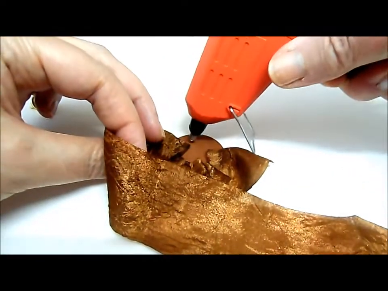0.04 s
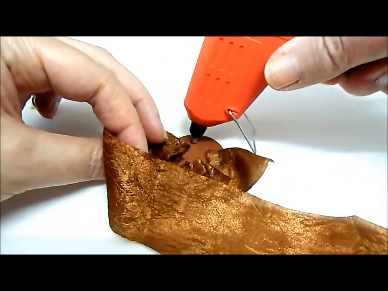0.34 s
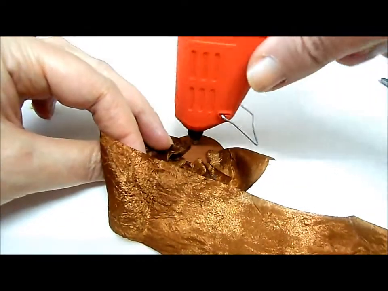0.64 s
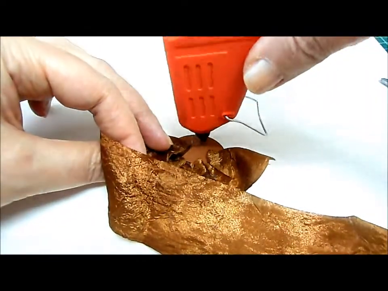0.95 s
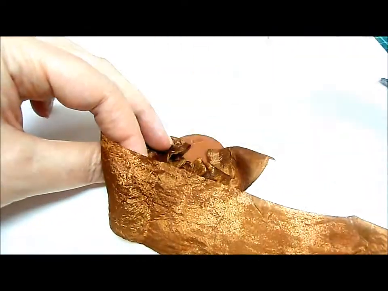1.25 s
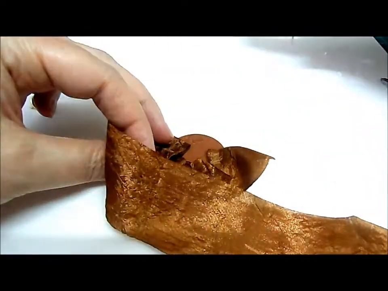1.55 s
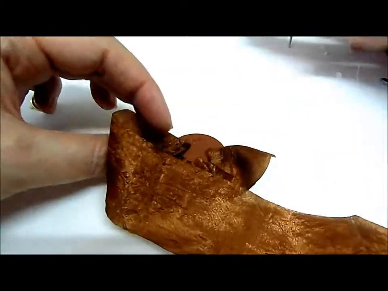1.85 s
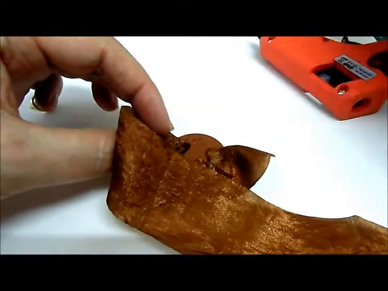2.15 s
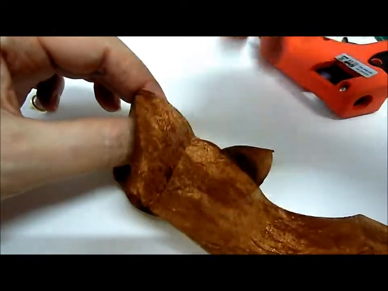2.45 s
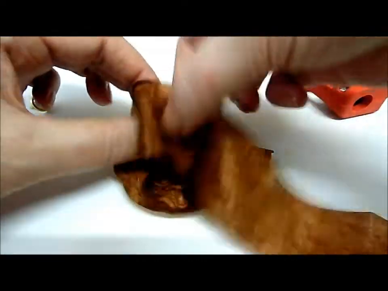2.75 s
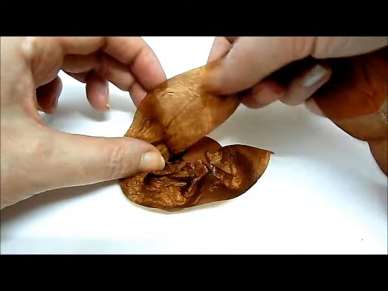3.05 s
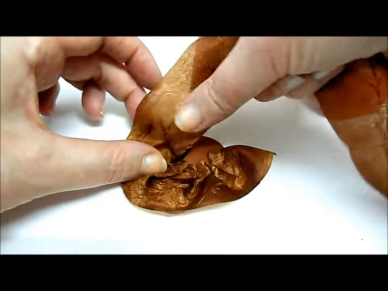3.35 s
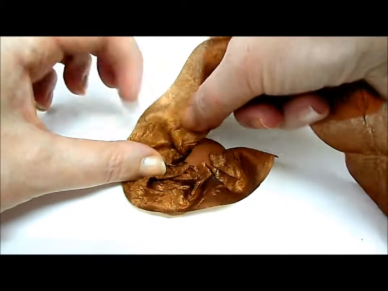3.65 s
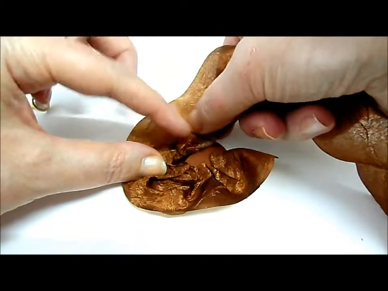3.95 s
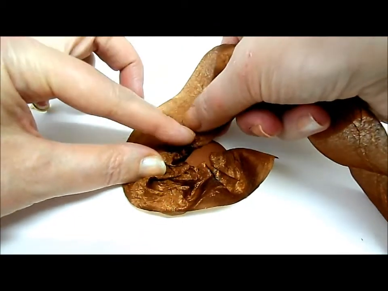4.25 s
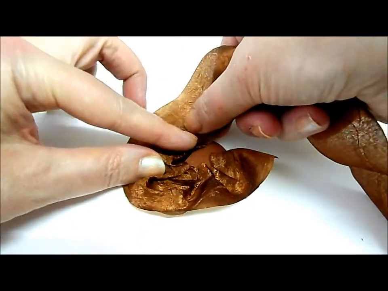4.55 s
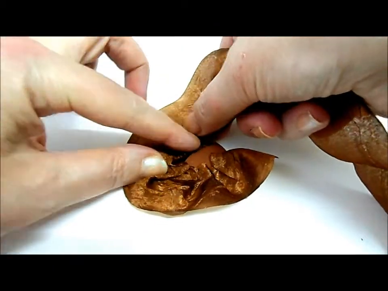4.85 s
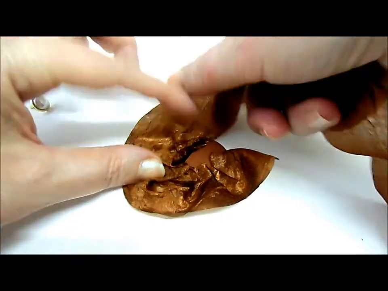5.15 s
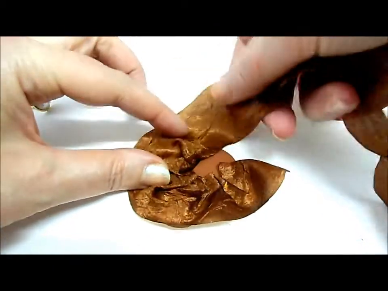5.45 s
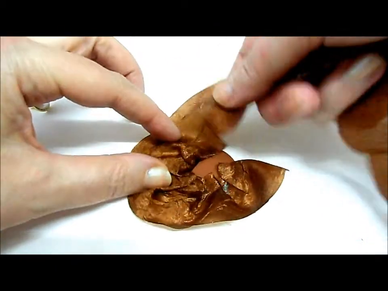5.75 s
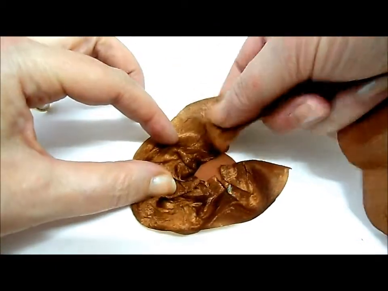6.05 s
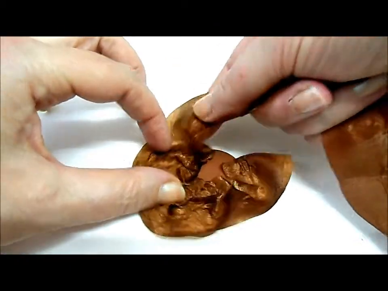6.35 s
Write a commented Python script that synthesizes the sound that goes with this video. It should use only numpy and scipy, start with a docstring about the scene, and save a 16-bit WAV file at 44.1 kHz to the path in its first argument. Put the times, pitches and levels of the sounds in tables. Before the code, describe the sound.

A glue gun knocks and clatters onto a tabletop, followed by quiet ribbon rustling and light clicks over a low rumble.

```python
"""Faint, even ticking comes first, close to the microphone in a small room; then ribbon rustles.
A hot glue gun scrapes the ribbon flower, bumps the worktable and is dropped, rocking to rest: its hollow
shell rings, the tabletop booms and the hardest knock overloads the microphone. Fingers fold and pinch
the stiff ribbon, stroke by stroke, with light clicks and more ticking over a low rumble and hiss."""
import sys
import numpy as np
from scipy import signal
from scipy.fft import rfft, irfft
from scipy.io import wavfile

SR = 44100
rng = np.random.default_rng(int(sys.argv[2]) if len(sys.argv) > 2 else 0)


def materialize(psi):
    """Save the field psi as 16-bit PCM at rate SR to the path in sys.argv[1].

    A 1-D psi becomes a single channel; in a 2-D psi each row is a channel.
    """
    bounded = np.clip(np.atleast_2d(psi).T, -1, 1)
    quanta = np.round(bounded * 32767).astype(np.int16)
    wavfile.write(sys.argv[1], SR, quanta)


N = 290619
RING = np.arange(SR // 2) / SR  # time axis of one short sound [s]


# the gun landing, close up: (time [s], tabletop [dB], shell [dB], crack [dB], tabletop cutoff [Hz])
GUN_KNOCKS = [(1.593, -6, -39, -24.5, 383), (1.629, -20.5, -29.5, -27.5, 1400),
              (2.0147, -29.5, -53, -41, 1340), (2.0611, -20, -18, -17, 702),
              (2.0650, -14.5, -32, -25.5, 397), (2.0720, 2.5, 2.5, -4, 3550),
              (2.1365, -14.5, -44, -22.5, 420), (2.1393, -21.5, -41, -17.5, 2010),
              (2.1683, -25, -27, -30, 596), (2.1728, -25, -31, -30, 1160)]
def glue_gun():
    """Each blow cracks at the contact, rings the hollow shell and booms the tabletop."""
    out = np.zeros(N)
    for s, table_db, shell_db, crack_db, cutoff_hz in GUN_KNOCKS:
        add(out, s, undb(shell_db) * shell() + undb(crack_db) * crack())
        add(out, s + .0007, undb(table_db) * tabletop(cutoff_hz))  # the heavy top answers a moment later
    return out


# modes of the worktable: (frequency [Hz], level [dB], t60 [s])
TABLETOP_MODES = [(43.2, -24.5, 0.18), (101, -15.5, 0.23), (115.1, -20, 0.196), (196.5, -21, 0.13),
                  (243, -20, 0.13), (296, -17.5, 0.084), (339, -19, .1), (433.3, -28.5, .08),
                  (595, -20.5, 0.044), (629, -9.5, 0.04), (783, -17.5, 0.042), (844, -17.5, 0.049),
                  (997, -13, 0.032), (1090, -20.5, 0.077), (1238, -13.5, 0.034), (1441, -23, 0.042),
                  (1540, -28, 0.0304)]
def tabletop(cutoff_hz):
    """The struck tabletop booms; a soft contact reaches only its low modes."""
    return soften(ring(TABLETOP_MODES), cutoff_hz)


# modes of the gun's plastic shell: (frequency [Hz], level [dB], t60 [s])
SHELL_MODES = [(1950, -28, 0.027), (2254, -12, 0.018), (2396, -23.5, 0.016), (2606, -5.5, 0.013),
               (3210, -22, 0.022), (4200, -23, 0.0098), (4450, -12, 0.013), (4970, -20, 0.015),
               (6220, -17.5, .01), (7520, -25.5, 0.0068), (8550, -25, 0.018)]
def shell():
    """The irregular shell rings with its modes out of step."""
    return soften(ring(SHELL_MODES, stagger=np.pi / 2), cutoff_hz=8640)


# spectrum of the contact: (frequency [Hz], relative level [dB])
CRACK_SPECTRUM = [(200, 20), (1500, -1.5), (5000, -0.5), (8000, -7.5), (12000, -10), (16000, -20)]
def crack():
    """A sharp burst, after which loose parts inside the gun buzz on briefly."""
    return colour(hiss(), CRACK_SPECTRUM) * (fade(0.014) + undb(-18) * fade(0.13))


# the gun's wire stand as it bumps the table: (time [s], level [dB], pitch [Hz])
STAND_PINGS = [(1.593, -31, 2040), (1.631, -42, 931)]
def wire_stand():
    """The bent wire rings briefly in one narrow band."""
    out = np.zeros(N)
    for s, db, hz in STAND_PINGS:
        add(out, s, undb(db) * burst(hz, octaves=.16, t60=110 / hz))  # rings for 110 cycles
    return out


# the gun being drawn away: (start [s], length [s], level [dB])
GUN_SCRAPES = [(0.913, .07, -53.5), (1.312, 0.069, -57), (1.387, 0.02, -45), (1.414, .014, -48.5)]
# resonances of the scraping gun: (centre [Hz], width [octaves], relative level [dB])
SCRAPE_BANDS = [(1570, 0.16, 1), (2880, 0.28, 2.5), (4270, 0.086, -3), (7850, 0.29, -10)]
def gun_scrapes():
    """Short, gritty slips swell and stop, all ringing the same resonances."""
    out = np.zeros(N)
    for s, length, db in GUN_SCRAPES:
        speed = np.sin(np.pi * np.minimum(RING / length, 1))
        grit = fibres(snaps_per_s=340, spread_db=4.0)
        rasp = sum(undb(level) * bell(grit, hz, octaves) for hz, octaves, level in SCRAPE_BANDS)
        add(out, s, undb(db) * speed * unit(rasp))
    return out


# ribbon sliding under the fingers, close up: (start [s], end [s], level [dB], tilt [dB/octave])
RIBBON_STROKES = [(.57, 0.804, -61.5, -6), (.90, 1.01, -58.5, -2), (1.136, 1.363, -55.5, 0.5),
                  (1.279, 1.403, -54.5, -4.5), (1.378, 1.52, -59, -4.5), (1.653, 1.85, -62, -4.5),
                  (1.953, 2.08, -56, -3), (2.601, 2.907, -60.5, 2.5), (2.761, 3.248, -59.5, 1.5),
                  (2.897, 2.99, -58, 12), (2.973, 3.092, -51.5, 1), (3.128, 3.29, -59.5, 0),
                  (3.303, 3.53, -59, 1.5), (3.678, 3.80, -57.5, 1.5), (5.136, 5.233, -56, -0.5),
                  (5.267, 5.426, -57.5, 0), (5.369, 5.688, -63.5, 0), (5.722, 5.903, -57, 1),
                  (5.898, 6.318, -60, 1.5), (6.253, 6.46, -57, 1), (6.421, 6.624, -53.5, 1.5)]
# spectrum of sliding ribbon: (frequency [Hz], relative level [dB])
RUSTLE_SPECTRUM = [(300, -17.5), (1000, -2.5), (2500, 1), (4500, 0), (6500, -1), (9000, -.5), (11500, -1.5),
                   (15000, 0)]
def ribbon():
    """Each stroke swells, holds and eases, and bends the cloth into new resonances."""
    out = np.zeros(N)
    swell_share, ease_share, folds_per_octave, catch_hz = 0.29, 0.334, 4, 42.8
    for start, end, db, tilt in RIBBON_STROKES:
        progress = RING / (end - start)
        ramp = np.minimum(progress / swell_share, (1 - progress) / ease_share)
        speed = np.sin(np.pi / 2 * np.clip(ramp, 0, 1))
        rub = fibres(snaps_per_s=310, spread_db=3)
        folds = uneven(folds_per_octave * log_bins(rub), db=1.9)
        folded = irfft(rfft(rub) * folds, len(rub))
        tilted = [(hz, level + tilt * np.log2(hz)) for hz, level in RUSTLE_SPECTRUM]
        weave_catch = uneven(catch_hz * RING, db=0.1)
        add(out, start, undb(db) * speed * weave_catch * colour(folded, tilted))
    return out


def fibres(snaps_per_s, spread_db):
    """Threads catch and slip: tiny snaps of uneven size over a smooth rub."""
    caught = rng.random(len(RING)) < snaps_per_s / SR
    sizes = undb(spread_db * np.minimum(rng.exponential(size=len(RING)), 4))
    grip = signal.lfilter([1], [1, -np.exp(-1 / (0.002 * SR))], caught * sizes)  # relaxes in 2 ms
    return hiss() * (1 + unit(grip))


# clicks of the gun, nails and creasing ribbon: (time [s], level [dB], centre [Hz])
LIGHT_CLICKS = [(.155, -52.5, 1670), (.4555, -41, 12300), (.514, -45.5, 1600), (1.053, -43, 4740),
                (1.1388, -43.5, 5500), (1.946, -37, 12000), (1.973, -42, 12000), (1.992, -39, 12000),
                (3.516, -50, 7500), (3.857, -50.5, 7000), (3.878, -52, 5030), (4.914, -51, 4950),
                (5.041, -45, 7900), (5.0492, -35, 14000), (5.06, -38, 7000), (6.493, -42, 7900)]
# fingertips pressing the flower on the table: (time [s], level [dB])
FINGER_PRESSES = [(5.553, -33), (5.637, -43.5), (5.815, -26)]
def fingers():
    """Brief clicks, the higher the shorter, and soft presses that thud in the tabletop."""
    out = np.zeros(N)
    for s, db, hz in LIGHT_CLICKS:
        add(out, s, undb(db) * burst(hz, octaves=0.79, t60=85 / hz))  # rings for 85 cycles
    for s, db in FINGER_PRESSES:
        add(out, s, undb(db) * tabletop(cutoff_hz=178.5))
    return out


# faint runs of ticks: (start [s], end [s], rate [1/s], start level [dB], end level [dB])
TICK_RUNS = [(0.01, 0.123, 30.5, -47.5, -44), (2.246, 2.577, 30.9, -43, -53.5),
             (4.571, 4.894, 30, -46.5, -54.5)]
def ticking():
    """Evenly paced ticks, each a crisp edge and a hollow ring; a run grows or fades as it goes."""
    out = np.zeros(N)
    for start, end, rate, start_db, end_db in TICK_RUNS:
        for s in np.arange(start, end, 1 / rate):
            db = np.interp(s, [start, end], [start_db, end_db]) + 2.8 * rng.standard_normal()
            edge = undb(-10) * burst(hz=3500, octaves=1.76, t60=0.029)
            body = undb(-3) * burst(hz=1500, octaves=0.72, t60=0.037)
            add(out, s, undb(db) * (edge + body))
    return out


# reverberation of the small room around the table: (band centre [Hz], level [dB], t60 [s])
ROOM_BANDS = [(114.9, -7.5, 0.48), (246, -3.5, 0.19), (490, -7.5, 0.11), (1011, -19, 0.42),
              (1888, -11.5, 0.17), (4050, -23, 0.27), (8050, -22, 0.19), (13900, -8.5, 0.11)]
def room(x):
    """Dense reflections build up within milliseconds of the direct sound and die away band by band."""
    tail = sum(undb(db) * bell(hiss(), hz, octaves=0.56) * fade(t60) / np.linalg.norm(fade(t60))
               for hz, db, t60 in ROOM_BANDS)
    build_up = 1 - fade(0.034)
    return x + signal.fftconvolve(x, tail * build_up)[:N]


# the quiet room at the microphone: (frequency [Hz], relative level [dB])
ROOM_TONE_SPECTRUM = [(20, 2.5), (35, -5), (55, 0.5), (100, -3), (150, -5), (200, -7), (320, -10.5),
                      (500, -15.5), (1000, -23), (2000, -31.5), (4000, -38.5), (8000, -42.5),
                      (16000, -45.5)]
def room_tone():
    """The room rumbles and the microphone hisses, both steadily."""
    return undb(-44.5) * colour(rng.standard_normal(N), ROOM_TONE_SPECTRUM)


def undb(db):
    """Decibels to gain."""
    return 10 ** (np.asarray(db) / 20)


def unit(x):
    """Scale to rms 1."""
    return x / np.sqrt(np.mean(x ** 2))


def log_bins(x):
    """Octave position of each spectral bin of x."""
    return np.log2(np.maximum(np.fft.rfftfreq(len(x), 1 / SR), 1))


def colour(x, points):
    """Shape x by a spectrum of (frequency [Hz], level [dB]) points, at rms 1."""
    hz, db = np.transpose(points)
    gain = undb(np.interp(log_bins(x), np.log2(hz), db))
    return unit(irfft(rfft(x) * gain, len(x)))


def bell(x, hz, octaves):
    """Keep a bell-shaped band of x."""
    gain = np.exp(-.5 * ((log_bins(x) - np.log2(hz)) / octaves) ** 2)
    return irfft(rfft(x) * gain, len(x))


def fade(t60):
    """Exponential decay, 60 dB in t60 seconds."""
    return np.exp(-np.log(1000) * RING / t60)


def hiss():
    """Half a second of white noise."""
    return rng.standard_normal(len(RING))


def burst(hz, octaves, t60):
    """A band of noise that starts at once and fades."""
    return unit(bell(hiss(), hz, octaves)) * fade(t60)


def uneven(position, db):
    """A gain that wanders by db, with a new random value at each whole step of position."""
    steps = hiss()
    return undb(db * np.interp(position, np.arange(len(steps)), steps))


def ring(modes, stagger=0):
    """Struck, fading modes, each starting stagger radians behind the last."""
    return sum(undb(db) * fade(t60) * np.cos(2 * np.pi * hz * RING - stagger * k)
               for k, (hz, db, t60) in enumerate(modes))


def soften(x, cutoff_hz):
    """Low-pass: a longer contact cannot excite the higher modes."""
    return signal.sosfilt(signal.butter(3, cutoff_hz, fs=SR, output="sos"), x)


def add(out, s, sound):
    """Mix a sound in at s seconds."""
    i = int(s * SR)
    out[i:i + len(sound)] += sound[:max(N - i, 0)]


def scene():
    """Handling at the worktable, heard close up in mono over the room tone."""
    background = room_tone()
    handling = glue_gun() + wire_stand() + fingers() + gun_scrapes() + ticking() + ribbon()
    return (room(handling) + background)[None]


def record(dry):
    """The close microphone clips just under full scale, and the top is cut at 15.9 kHz."""
    clipped = np.clip(dry, -.9, .9)
    top_cut = signal.ellip(14, .1, 100, 15900, fs=SR, output="sos")
    return signal.sosfilt(top_cut, clipped)


dry = scene()
out = record(dry)
materialize(out)
```